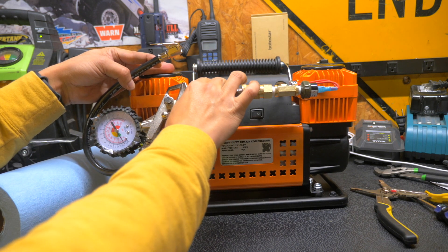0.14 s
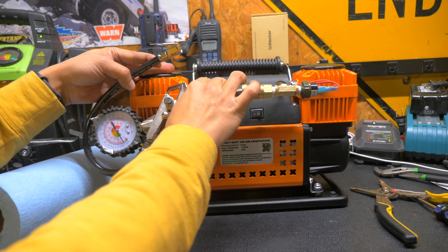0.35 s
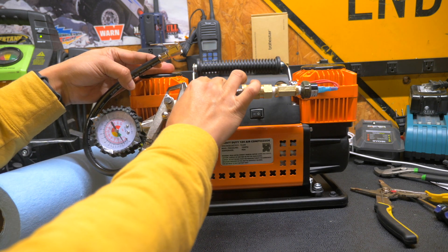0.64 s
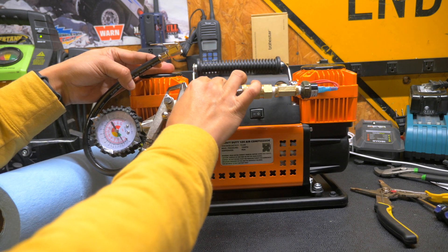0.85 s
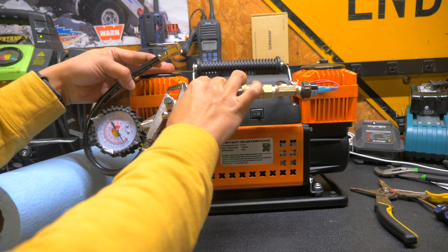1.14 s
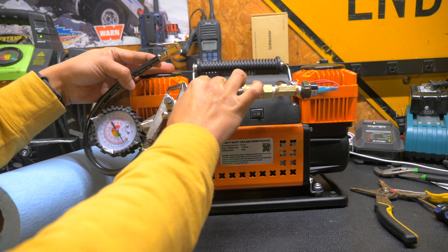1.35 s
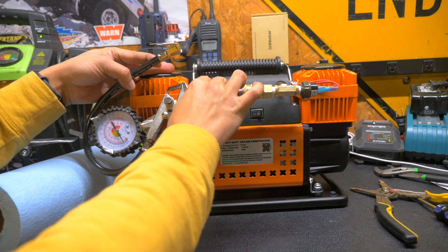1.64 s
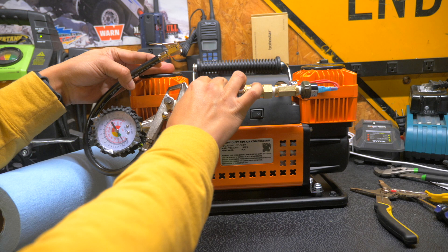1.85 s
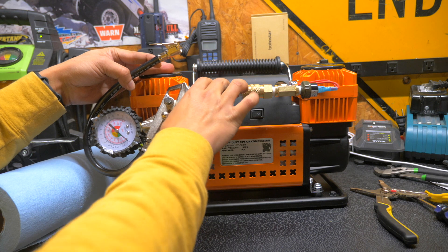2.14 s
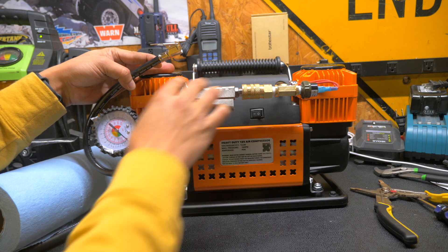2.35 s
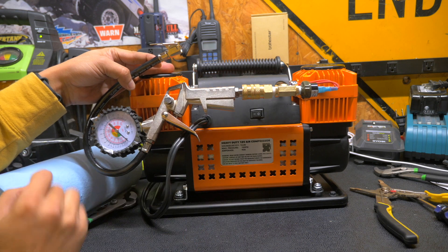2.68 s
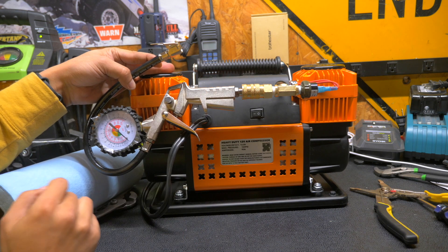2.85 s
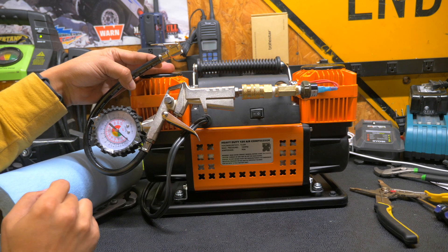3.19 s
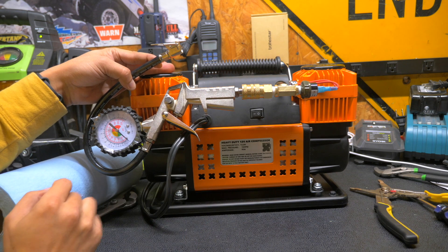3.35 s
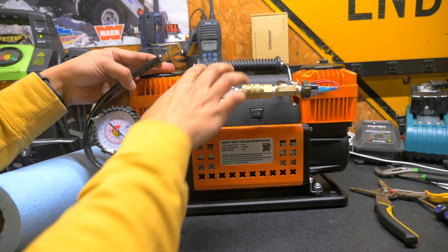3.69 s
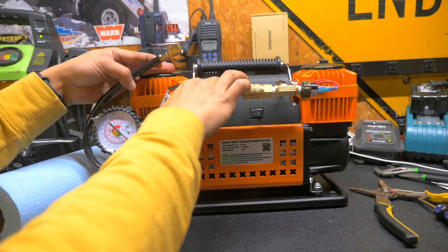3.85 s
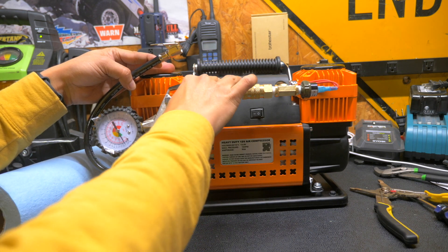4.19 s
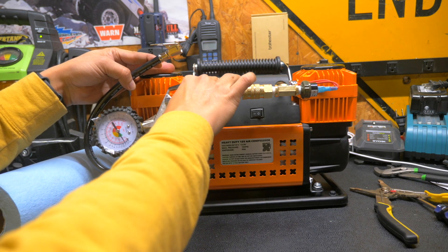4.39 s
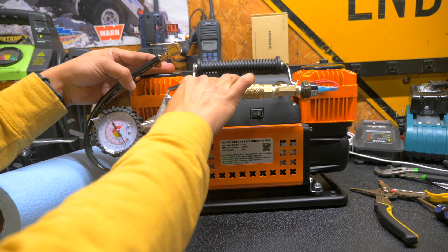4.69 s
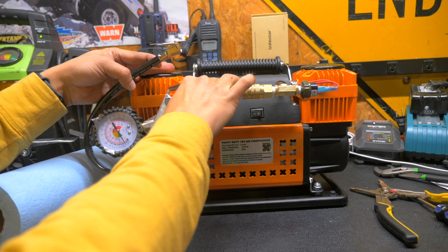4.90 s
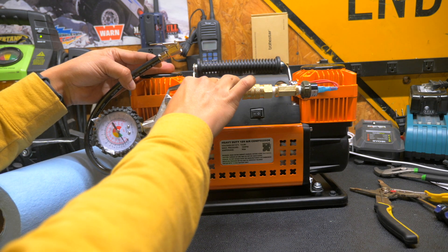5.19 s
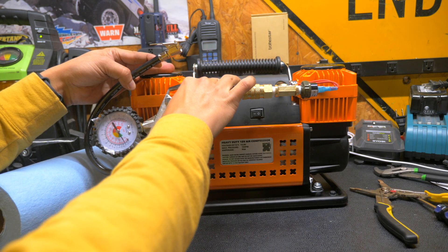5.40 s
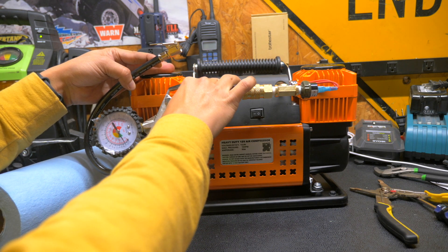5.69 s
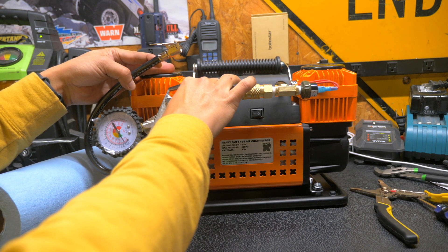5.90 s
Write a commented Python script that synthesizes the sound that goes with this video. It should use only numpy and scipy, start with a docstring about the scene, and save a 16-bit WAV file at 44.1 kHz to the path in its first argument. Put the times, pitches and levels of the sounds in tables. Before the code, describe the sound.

A small air compressor chugs rapidly under a bright air hiss, races when the hiss stops, cuts off with knocks, then hisses and restarts.

```python
"""A small two-piston air compressor chugs on a workshop bench while an air gun on its hose hisses.
The gun is let go, the motor races, cuts off and the machine knocks as it rocks to rest.
The gun hisses again, and soon after the motor restarts. All these moments are set in advance.
Each chug is a valve reed fluttering once a turn; the frame hums at multiples of the crank speed.
Shaped noise makes the rattle, bearings, thud and air jet; the room adds echoes and quiet noise."""
import sys
import numpy as np
from scipy import signal
from scipy.fft import rfft, irfft, next_fast_len
from scipy.io import wavfile
from scipy.ndimage import uniform_filter1d

SR = 44100
rng = np.random.default_rng(int(sys.argv[2]) if len(sys.argv) > 2 else 0)


def wav_out(sig):
    """Save sig, one row per channel (or a flat mono array), as 16-bit PCM at SR to the path in sys.argv[1]."""
    wavfile.write(sys.argv[1], SR, np.round(np.clip(np.atleast_2d(sig).T, -1, 1) * 32767).astype(np.int16))


N = 266187
TIME = np.arange(N) / SR  # seconds

# the motor starts, is cut off, stands still and starts again (seconds)
START_S, CUT_OFF_S, STOP_S, RESTART_S = -.25, 2.68, 2.885, 4.145
RUN_TURNS_PER_S = 36.758  # running speed after the restart

# Pulls of the air gun's trigger. Each row: opens in seconds, shuts in seconds,
# level at opening in dB (before blast and flicker), sag in dB per second.
TRIGGER_PULLS = [(-.25, 2.122, -22.1, .9), (4.054, 6.2, -22.8, .6)]


def undb(db):
    """Turn decibels into a gain."""
    return 10 ** (np.asarray(db) / 20)


def unit(x):
    """Scale a sound to an average (rms) strength of 1."""
    return x / np.sqrt(np.mean(x ** 2) + 1e-20)


def noise(spectrum):
    """Noise of rms 1 whose loudness at each pitch follows a (Hz, dB) table."""
    hz, db = np.transpose(spectrum)
    size = next_fast_len(N)
    f = np.maximum(np.fft.rfftfreq(size, 1 / SR), 1)
    gain = undb(np.interp(np.log(f), np.log(hz), db))
    # below the first row the bass falls away
    gain = gain * np.minimum(f / hz[0], 1) ** 2
    white = rfft(rng.standard_normal(size))
    return unit(irfft(white * gain, size)[:N])


def resonate(x, hz, width_hz):
    """Let one resonance ring, with gain 1 at its centre."""
    b, a = signal.iirpeak(hz, hz / width_hz, fs=SR)
    return signal.lfilter(b, a, x)


def walk(rate):
    """A smooth random wander, spread near 1, with `rate` new values a second."""
    k = max(int(SR / rate), 1)
    steps = np.repeat(rng.standard_normal(N // k + 1), k)
    return 1.2 * uniform_filter1d(uniform_filter1d(steps, k), k)[:N]


def burst(start, decay):
    """Noise that starts at once and dies away."""
    age = TIME - start
    return rng.standard_normal(N) * (age > 0) * np.exp(-np.clip(age / decay, 0, 40))


def hose(at, fill_power=2.1, choke_s=.14, vent_s=.06):
    """Choked flow and hose pressure, both 0-1: they build behind the shut gun and drop when it opens."""
    shuts, opens = TRIGGER_PULLS[0][1], TRIGGER_PULLS[1][0]
    shut_for = np.maximum(at - shuts, 0)
    held = np.exp(-np.maximum(at - opens, 0) / vent_s)
    choked = 1 - np.exp(-shut_for / choke_s)
    pressure = np.minimum(shut_for / (CUT_OFF_S - shuts), 1) ** fill_power
    return choked * held, pressure * held


def motor(at, settle_s=.33):
    """Seconds since the latest start, how unsettled the pump is (0-1), how far it has coasted (0-1)."""
    first = at < RESTART_S
    age = at - np.where(first, START_S, RESTART_S)
    unsettled = np.exp(-(age / settle_s) ** 4)
    coasted = first * np.clip((at - CUT_OFF_S) / (STOP_S - CUT_OFF_S), 0, 1)
    return age, unsettled, coasted


def first_run_speed():
    """Crank speed of the first run: steady, a stumble as the gun shuts, racing, coasting to rest."""
    # Each row: time in seconds, crank speed in turns per second.
    speed_points = [(0, 33.68), (.1, 36.87), (2.1, 36.797), (2.2, 34.16), (2.4, 38.29), (2.6, 46.43),
                    (2.68, 46.45), (2.8, 20.59), (2.885, 0)]
    return np.interp(TIME, *np.transpose(speed_points))


def restart_speed(kick_turns_per_s=14.82, spin_up_s=.0931):
    """Crank speed of the second run: it jumps to a first speed and closes in on its running speed."""
    age = np.maximum(TIME - RESTART_S, 0)
    shortfall = (RUN_TURNS_PER_S - kick_turns_per_s) * np.exp(-age / spin_up_s)
    return (age > 0) * (RUN_TURNS_PER_S - shortfall)


def crank(speed, angle):
    """Crank angle in turns at every moment, adding up the speed from a first angle."""
    return angle + np.cumsum(speed) / SR


def stroke_pitch(when, start_rise=.028, pressure_drop=.012, coast_drop=.03):
    """Flutter pitch ratio: sharp just after a start, flat against pressure and while coasting."""
    (_, pressure), (_, unsettled, coasted) = hose(when), motor(when)
    return 1 + start_rise * unsettled - pressure_drop * pressure - coast_drop * coasted


def stroke_roughness(when, steady=.08, after_start=.14, when_choked=.27):
    """Strokes are even in free flow, ragged after a start and when driven against the shut gun."""
    (choked, _), (_, unsettled, coasted) = hose(when), motor(when)
    return steady + after_start * unsettled + when_choked * choked * (1 - coasted)


def stroke_slap_db(when, free_db=.5, start_db=-1.5, choked_db=-6, pressure_db=3, coast_db=-16):
    """The reeds slap their seats hardest in free flow and hardly at all by the end of coasting."""
    (choked, pressure), (_, unsettled, coasted) = hose(when), motor(when)
    load_db = choked_db * choked + pressure_db * pressure
    return free_db + start_db * unsettled + load_db + coast_db * coasted


def stroke_db(when, choke_loss_db, pressure_loss_db, coast_loss_db, fresh_db=.7, sag_db_per_s=.65):
    """A valve's level sags slowly through a run and changes with the load on it."""
    (choked, pressure), (age, _, coasted) = hose(when), motor(when)
    loss_db = choke_loss_db * choked + pressure_loss_db * pressure + coast_loss_db * coasted
    return fresh_db - sag_db_per_s * age - loss_db


def reeds(turns, swell=0.56, pitch_scatter=.04, time_scatter_s=0.00036, scatter_db=3.0):
    """Once a turn each valve lifts and flutters in the air stream; slapping its seat adds overtones."""
    # The reed valves. Each row: crank angle in turns, time open in seconds, basic flutter in Hz,
    # pitch glide as a share, late-swell exponent, basic level in dB, basic seat slap in dB,
    # turns earlier with the flow choked (negative: later), then losses in dB: with the flow choked,
    # at full pressure, by the end of coasting (negative: a gain).
    valve_rows = [(-.007, .01158, 530, 0.11, 1.85, -12.5, 2, .05, -1.2, 0, 2.5),
                  (.489, .01026, 536, 0.32, 1.28, -12.5, -1, .05, 2.5, 0, -2),
                  (-.215, .01067, 1054, -0.32, 1.8, -16, -29.5, .14, 1, 0, 20),
                  (.242, .00514, 945.7, 0.55, .68, -22.2, -32, -.15, -2, 2, 16)]
    # Overtones of a reed slapping its seat. Each row: multiple of the flutter pitch, level in dB.
    slap_overtones = [(2, -11), (3, -14.5), (4, -29.5)]
    out = np.zeros(N)
    for angle, length, hz, glide, late, db, slap_db, choked_shift, *losses_db in valve_rows:
        strokes = np.arange(np.ceil(turns[0] - angle), turns[-1] - angle) + angle
        due = np.interp(strokes, turns, TIME)
        (choked, _), (_, _, coasted) = hose(due), motor(due)
        # with the flow choked, three valves open earlier in the turn and the last one later
        shift = choked_shift * choked * (1 - coasted)
        when = np.interp(strokes - shift, turns, TIME)[:, None]
        # chance shifts each stroke's time, pitch and level
        chance = rng.standard_normal((3, len(when), 1)) * stroke_roughness(when)
        opens = when - length / 2 + time_scatter_s * chance[0]
        # one row of sample numbers per stroke
        index = (opens * SR).astype(int) + np.arange(int(length * SR) + 2)
        progress = np.clip((index / SR - opens) / length, 0, 1)
        lift = np.abs(np.sin(np.pi * progress ** late)) ** swell
        # the flutter pitch slides as the flow through the valve changes
        cycles = hz * stroke_pitch(when) * (1 + pitch_scatter * chance[1]) * length
        middle = progress - .5
        phase = 2 * np.pi * cycles * (middle + glide * middle ** 2 / 2)
        slap = sum(undb(d) * np.cos(round(k) * phase) for k, d in slap_overtones)
        slap_gain = undb(slap_db + stroke_slap_db(when))
        # a wide swing slaps a little more strongly
        flutter = lift * np.cos(phase) + slap_gain * lift ** 1.11 * slap
        size = undb(db + stroke_db(when, *losses_db) + scatter_db * chance[2])
        # add every stroke at its place in time
        out -= np.bincount(np.clip(index, 0, N - 1).ravel(), (size * flutter).ravel(), N)
    return out


def frame(turns, thrust_angle=.1, odd_db=-9, motor_db=-59):
    """Two nearly equal piston thrusts a turn shake the frame, so even multiples lead; the motor whines."""
    # How strongly the frame radiates the thrust. Each row: frequency in Hz, level in dB (before hum_gain).
    frame_response = [(45, -49), (73, -43), (110, -52.5), (147, -40), (185, -40.5), (208, -39.5),
                      (222, -45.5), (257, -40), (295, -40.5), (345, -33), (372, -33), (420, -36),
                      (500, -48)]
    speed = np.maximum(np.gradient(turns) * SR, 1)
    hz, db = np.transpose(frame_response)
    hum = np.zeros(N)
    for k in (2, 3, 4, 5, 6, 7, 8, 10):  # multiples of the crank speed
        level_db = np.interp(k * speed, hz, db) + odd_db * (k % 2)
        hum += undb(level_db) * np.cos(2 * np.pi * k * (turns - thrust_angle))
    whine = np.sin(2 * np.pi * 71 * turns)
    return hum + undb(motor_db) * whine


def hum_gain(speed, running_db=1.1, speed_power=2.1, start_db=-2.5):
    """The frame shakes harder as the crank turns faster."""
    _, unsettled, _ = motor(TIME)
    return undb(running_db + start_db * unsettled) * (speed / RUN_TURNS_PER_S) ** speed_power


def machine_gain(name, die_away_db_per_s=120):
    """Loudness of one machine noise: it follows the load while the crank turns and dies away at rest."""
    # Each named row: running level in dB, then dB added with the flow choked, at full pressure,
    # just after a start, by the end of coasting.
    noise_levels = {"bearings": (-47, 0, 4, -2, -13), "rattle": (-38, 7, 3.5, 2, -18.5),
                    "thud": (-65, 0, 19, 11, -1)}
    running_db, choked_db, pressure_db, start_db, coast_db = noise_levels[name]
    (choked, pressure), (_, unsettled, coasted) = hose(TIME), motor(TIME)
    at_rest_s = (TIME < RESTART_S) * np.maximum(TIME - STOP_S, 0)
    load_db = choked_db * choked + pressure_db * pressure + start_db * unsettled + coast_db * coasted
    return undb(running_db + load_db - die_away_db_per_s * at_rest_s)


def compressor(rattle_depth=0.44, hiss_depth=0.21, intake_hz=500, intake_width_hz=30, intake_db=-17,
               muffle_hz=2650):
    """Valve flutter, frame hum and thudding noise, with rattle and bearing hiss that throb with the crank."""
    # Noise colours of the bearings, the rattle and the thud. Each row: frequency in Hz, level in dB.
    bearing_colour = [(1800, -9.5), (2600, -0.5), (3300, -5.5), (3800, -0.5), (4400, -5), (5000, 0),
                      (5700, -6.5), (7000, -4), (8500, 1), (10500, -5.5), (12300, -11.5), (15800, -16.5)]
    rattle_colour = [(90, -19), (200, -15.5), (380, -7.5), (540, -3.5), (760, -3.5), (1000, 0.5),
                     (1280, -8.5), (1530, -4), (1900, -17), (2200, -18.5), (2700, -23.5), (3500, -38)]
    thud_colour = [(20, -18.5), (45, 0), (100, -3), (200, -1.5), (400, -8.5), (800, -38.5)]
    first_speed, second_speed = first_run_speed(), restart_speed()
    # each run begins at its own crank angle, in turns
    first, second = crank(first_speed, -.502), crank(second_speed, -.101)
    turns = np.where(TIME < RESTART_S, first, second)
    valves = reeds(first) + reeds(second)
    # the intake housing rings on between strokes
    valves = valves + undb(intake_db) * resonate(valves, intake_hz, intake_width_hz)
    tones = valves + frame(turns) * hum_gain(first_speed + second_speed)
    # so small a machine radiates hardly any deep bass
    tones = signal.sosfilt(signal.butter(5, 56, "high", fs=SR, output="sos"), tones)
    # the housing muffles the sharp edges of each stroke
    tones = signal.sosfilt(signal.butter(6, muffle_hz, fs=SR, output="sos"), tones)
    # the rattle throbs twice a turn, the hiss once
    rattle_throb = 1 + rattle_depth * np.cos(4 * np.pi * turns)
    hiss_throb = 1 + hiss_depth * np.cos(2 * np.pi * turns)
    rattle = noise(rattle_colour) * rattle_throb * machine_gain("rattle")
    hiss = noise(bearing_colour) * hiss_throb * machine_gain("bearings")
    thud = noise(thud_colour) * machine_gain("thud")
    return tones + rattle + hiss + thud


def air_gun(flicker_db=0.29, attack_s=.018, release_s=.009, blast_db=14):
    """A turbulent jet from the nozzle; a full hose makes the first blast louder."""
    # Colour of the jet noise. Each row: frequency in Hz, level in dB.
    jet_colour = [(150, -40.5), (900, -28), (2800, -25.5), (3600, -22), (4900, -13), (6300, -15),
                  (7300, -9.5), (7900, -2.5), (8500, 0), (9800, -3.5), (10400, -5.5), (12200, -11.5),
                  (14300, -6.5), (15800, -12.5)]
    _, pressure = hose(TIME)
    flow = np.zeros(N)
    for opens, shuts, db, sag_db_per_s in TRIGGER_PULLS:
        age = np.maximum(TIME - opens, 0)
        opening = np.minimum(age / attack_s, 1) ** 3
        closing = np.exp(-np.maximum(TIME - shuts, 0) / release_s)
        flow += opening * closing * undb(db - sag_db_per_s * age)
    return noise(jet_colour) * flow * undb(blast_db * pressure + flicker_db * walk(60))


def background(room_db=-64.5, swell_db=1.5, waver_db=0.2):
    """Quiet room noise that swells gently, with a few faint tones that waver slightly."""
    # Colour of the room noise. Each row: frequency in Hz, level in dB.
    room_colour = [(15, -33), (25, -2.5), (66, -16), (86, -7.5), (142, -6), (172, -11), (394, -20),
                   (501, -18), (588, -27.5), (749, -21.5), (927, -29.5), (3350, -41.5), (4500, -38.5),
                   (15000, -43.5)]
    # A faint whine in the shop. Each row: frequency in Hz, level in dB before the waver.
    whine_tones = [(748.3, -80), (726.7, -86), (96.9, -78), (140, -78.5)]
    # the square root of 2 gives each sine an rms of 1
    tones = sum(undb(db) * np.sqrt(2) * np.sin(2 * np.pi * hz * TIME) for hz, db in whine_tones)
    room = noise(room_colour) * undb(room_db + swell_db * walk(9))
    return room + tones * undb(waver_db * walk(7.6))


def workshop(x, t60_low_s=.42, t60_high_s=.3, wet_db=-21):
    """A small cluttered room: a short diffuse tail whose treble dies first."""
    t = TIME[:SR // 2]
    low, high = rng.standard_normal((2, len(t)))
    # each part of the tail falls by 60 dB in its own time
    low = signal.sosfilt(signal.butter(2, 2000, fs=SR, output="sos"), low)
    low = low * undb(-60 * t / t60_low_s)
    high = signal.sosfilt(signal.butter(2, 2000, "high", fs=SR, output="sos"), high)
    high = high * undb(-60 * t / t60_high_s)
    tail = (low + high) * (t > .005)
    return x + undb(wet_db) * signal.fftconvolve(x, tail / np.sqrt(np.sum(tail ** 2)))[:N]


def bench(x, scatter_db=-10, spread_s=.0025):
    """Tools and casing close by scatter the treble within milliseconds and ripple its colour."""
    t = TIME[:SR // 64]
    echoes = rng.standard_normal(len(t)) * np.exp(-t / spread_s) * (t > .0004)
    echoes = signal.sosfilt(signal.butter(4, 3000, "high", fs=SR, output="sos"), echoes)
    return x + undb(scatter_db) * signal.fftconvolve(x, echoes / np.sqrt(np.sum(echoes ** 2)))[:N]


def knocks(first_s=2.944, period_s=.04, first_db=-45, fall_db=2.2, contact_s=.012, count=4):
    """The stalled machine rocks on its feet, each blow weaker and ringing the casing; metal fittings tick."""
    # Rings of the casing. Each row: frequency in Hz, width in Hz, level in dB.
    casing_rings = [(350, 37, 22), (646, 55, 20), (930, 98, 8), (1530, 150, -4), (2130, 100, -4),
                    (3800, 100, -12)]
    # Small metal ticks. Each row: start in seconds, level in dB (applied to the filtered burst),
    # centre in Hz, decay in seconds.
    tick_rows = [(2.656, -28.5, 11000, .005), (2.677, -33.5, 11000, .005), (2.70, -36.5, 10000, .005),
                 (2.755, -41.5, 10000, .005), (3.429, -53, 3500, .005), (3.8, -63.5, 1500, .025)]
    blows = np.zeros(N)
    for k in range(count):
        blows += undb(first_db - fall_db * k) * burst(first_s + k * period_s, contact_s)
    casing = sum(undb(db) * resonate(blows, hz, width) for hz, width, db in casing_rings)
    ticks = sum(undb(db) * resonate(burst(s, decay), hz, 0.64 * hz) for s, db, hz, decay in tick_rows)
    return casing + ticks


def scene():
    """Compressor and air gun on the bench, heard from close by."""
    machine = compressor() + air_gun() + knocks()
    return (bench(workshop(machine)) + background())[None]


def record(dry, top_hz=15800):
    """The microphone chain cuts the top."""
    return signal.sosfilt(signal.ellip(10, .2, 80, top_hz, fs=SR, output="sos"), dry)


dry = scene()
out = record(dry)
wav_out(out)
```